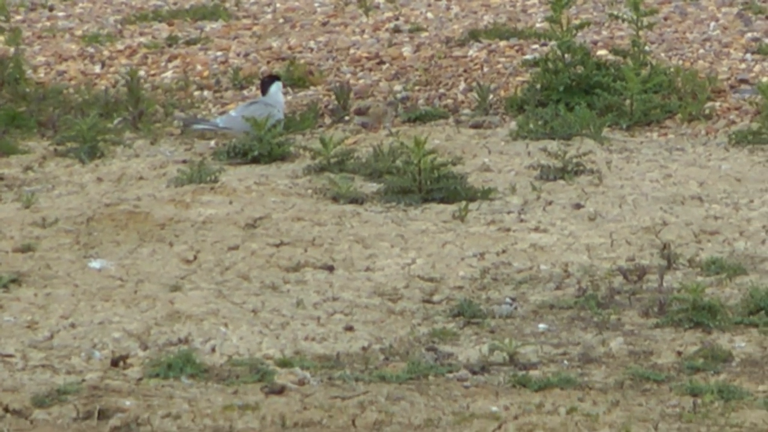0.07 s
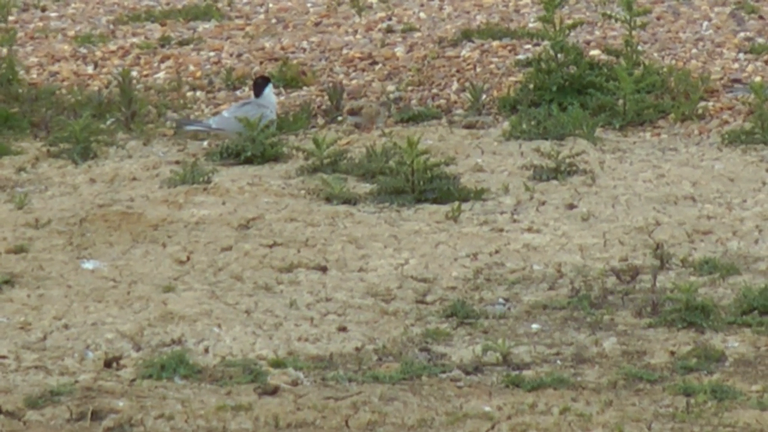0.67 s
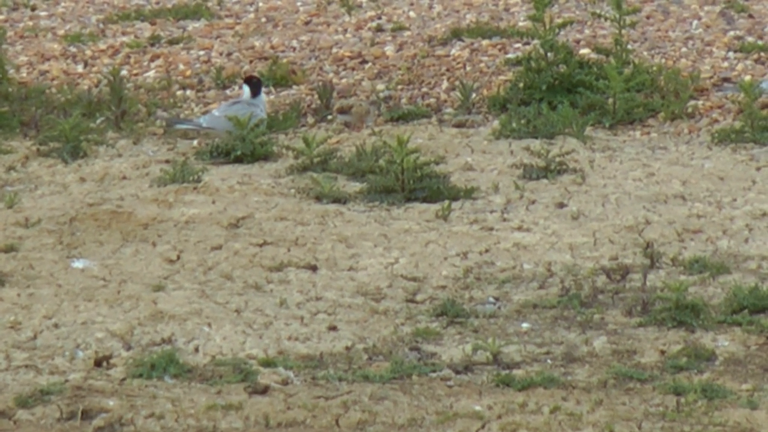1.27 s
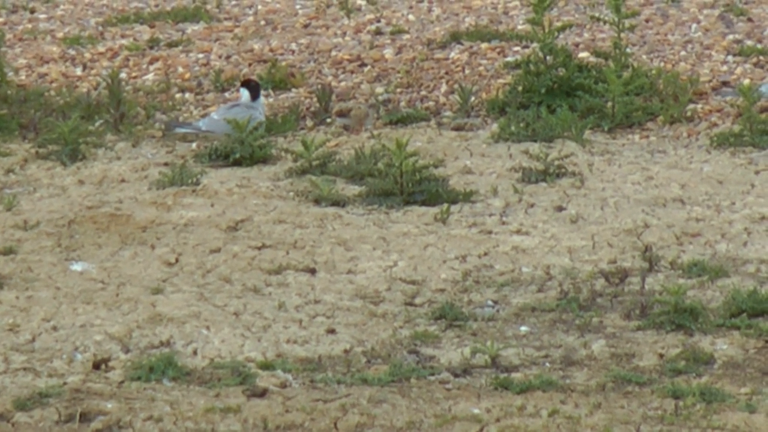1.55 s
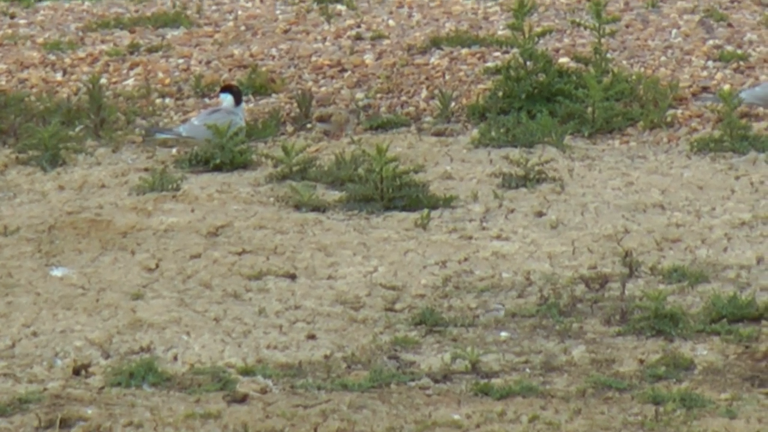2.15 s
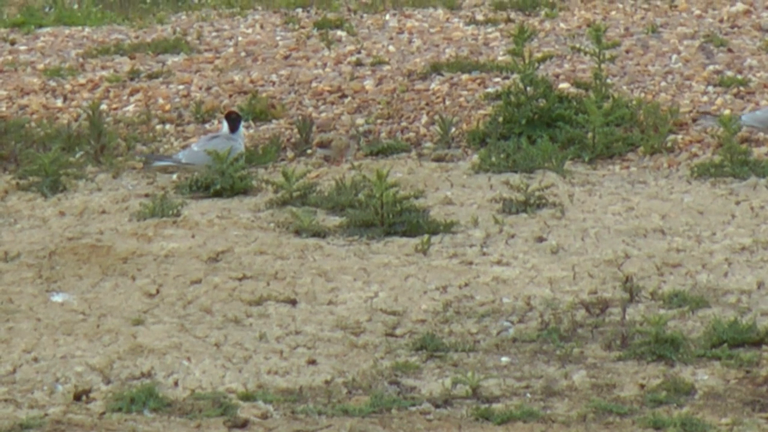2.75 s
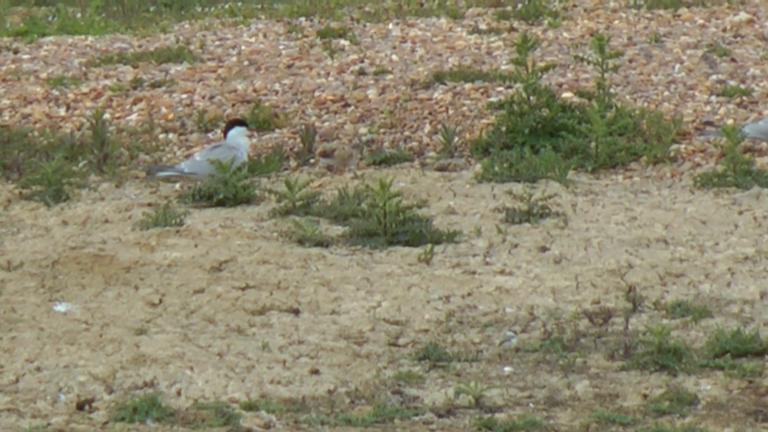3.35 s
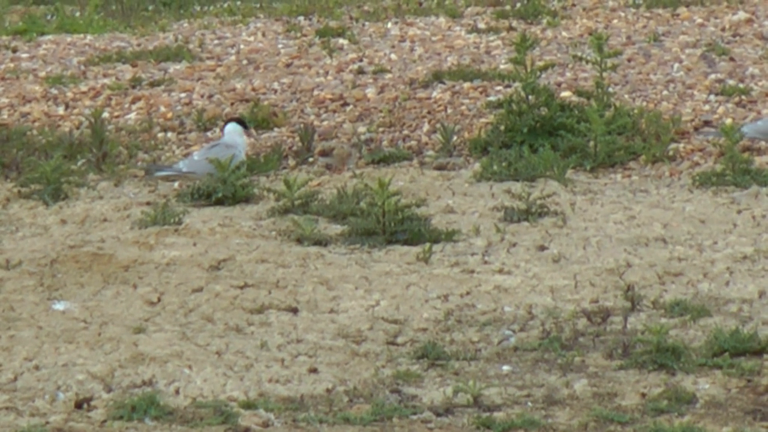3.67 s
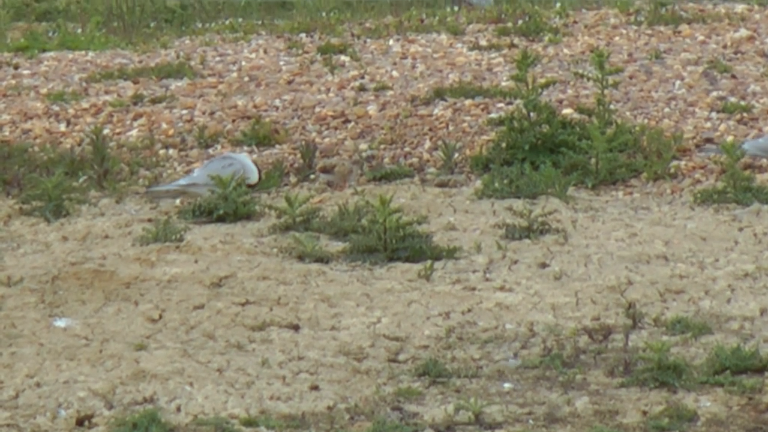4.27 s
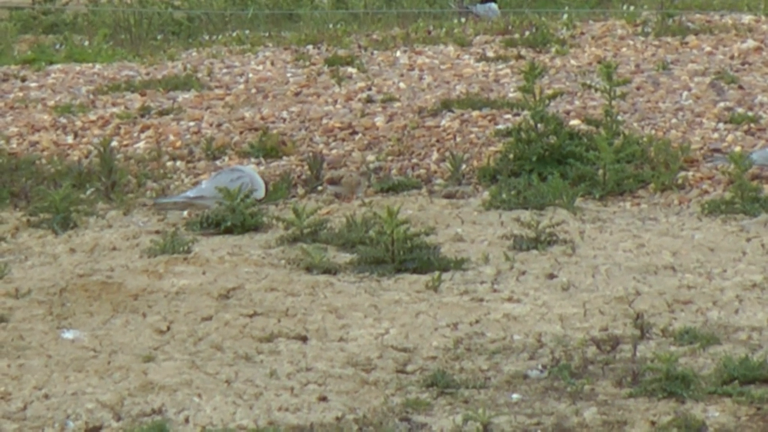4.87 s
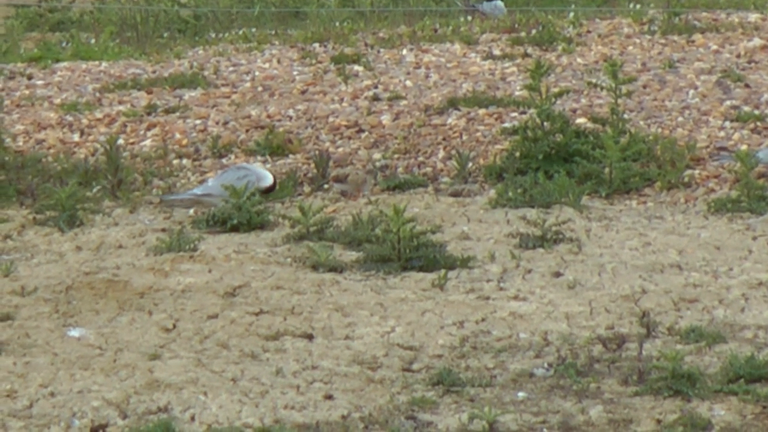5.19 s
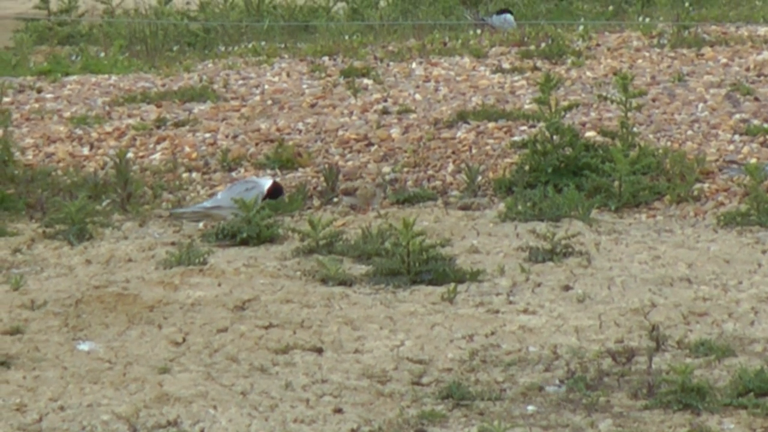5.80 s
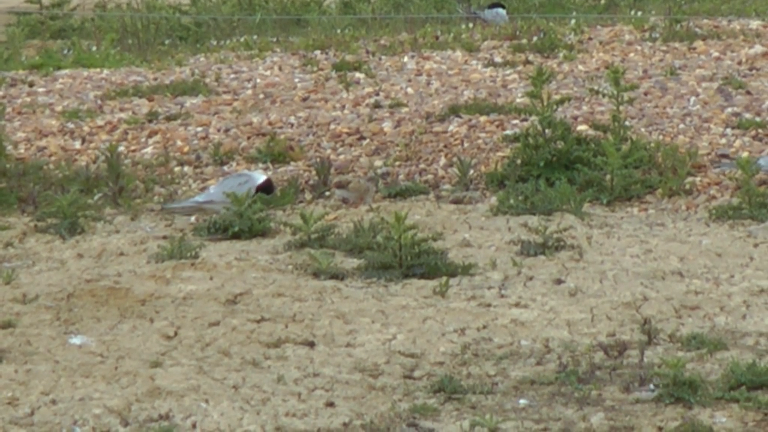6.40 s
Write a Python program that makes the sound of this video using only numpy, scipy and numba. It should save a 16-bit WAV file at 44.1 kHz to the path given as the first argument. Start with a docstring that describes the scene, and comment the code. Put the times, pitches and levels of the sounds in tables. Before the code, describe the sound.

A tern calls nearby with short, sharp, high chirps, about ten of them at uneven intervals. Gusts of wind rumble and flap on the microphone in three main bouts, at the start, a little before the middle and, hardest, near the end. Farther off, other birds add a few thin rising whistles and faint hoarse cries, mostly in the second half, over a soft, steady hiss of open shore.

```python
"""Terns on a shingle bank

One tern repeats a short, sharp "kip" nearby, each call scattered back by the open ground. Birds further
off slur thin whistles and hoarse cries over the hiss of the shore. Gusts rumble and flap on the
microphone ports, and the hardest buffets make a limiter duck everything else."""
import sys
import numpy as np
from scipy import signal
from scipy.fft import rfft, irfft
from scipy.io import wavfile
from scipy.ndimage import uniform_filter1d
from numba import njit

SR = 44100
rng = np.random.default_rng(int(sys.argv[2]) if len(sys.argv) > 2 else 0)


def dump(signal):
    """Clip the signal to [-1, 1] and save it as 16-bit WAV at the path in sys.argv[1]."""
    limited = np.clip(np.atleast_2d(signal).T, -1, 1)
    pcm = np.round(limited * 32767).astype(np.int16)
    wavfile.write(sys.argv[1], SR, pcm)


N = 292824
TIME = np.arange(N) / SR
OPPOSITE = np.array([[1], [-1]])  # sign of the side signal: left, right


def undb(db):
    """Decibels to gain."""
    return 10 ** (np.asarray(db) / 20)


def colour(x, points):
    """Filter by (frequency [Hz], level [dB]) points, falling steeply beyond the last."""
    hz, db = np.transpose(points)
    freq_hz = np.maximum(np.fft.rfftfreq(N, 1 / SR), 1)
    rolloff = np.minimum(hz[-1] / freq_hz, 1) ** 4
    return irfft(rfft(x) * rolloff * undb(np.interp(np.log(freq_hz), np.log(hz), db)), N)


def noise(points):
    """Unit-rms noise with the given spectrum."""
    x = colour(rng.standard_normal(N), points)
    return x / x.std()


def walk(rate_hz):
    """Smooth random wander, spread near 1."""
    hold = max(int(SR / rate_hz), 1)
    steps = np.repeat(rng.standard_normal(N // hold + 1), hold)
    return 1.3 * uniform_filter1d(uniform_filter1d(steps, hold), hold)[:N]


def add(track, start_s, sound):
    """Mix a sound into a track."""
    i = max(int(start_s * SR), 0)
    track[..., i:i + sound.shape[-1]] += sound[..., :N - i]


def shore(level_db=-49, wander_db=1.33):
    """Nearly steady hiss of distant water and wind in the grass."""
    # hiss spectrum: (frequency [Hz], density [dB])
    spectrum = [(100, 1.5), (300, -4.5), (700, 1.5), (1100, 0), (2000, -7), (3000, -13), (5000, -14),
                (7500, -18.5), (9500, -25.5), (14000, -30), (15500, -34)]
    # stereo width: (frequency [Hz], side minus mid [dB])
    width = [(100, -10), (400, -10.5), (1000, -4), (2500, -6), (6000, -6.5), (16000, -8.5)]
    # hiss level: ducks briefly after the early buffets, recovers, then stays nearly steady
    # (time [s], level [dB])
    level_curve = [(0, 1), (.85, -1.5), (1.3, 0.8), (2, -0.5), (6.64, -.3)]
    hiss = noise(spectrum) + OPPOSITE * colour(noise(spectrum), width)
    return hiss * undb(level_db + np.interp(TIME, *np.transpose(level_curve)) + wander_db * walk(5.6))


def airflow(rise_db_per_s=500, fall_db_per_s=104):
    """Flow level in dB: each gust rises fast, holds and dies back into the breeze."""
    # breeze with a late lull: (time [s], level [dB])
    breeze = [(0, -43.5), (6, -43.5), (6.3, -49), (6.64, -44)]
    # gusts at the microphone: (start [s], hold [s], level [dB])
    gusts = [(0, 0.078, -34.5), (0.162, 0.21, -31.5), (0.523, 0.29, -27.5), (0.876, 0.62, -28.5),
             (1.875, .15, -39), (2.327, .09, -30), (2.475, .23, -25), (3.037, 0.25, -37),
             (3.46, 0.018, -40), (3.811, 0.034, -32.5), (4.004, 0.085, -27.5), (4.289, .12, -31.5),
             (4.794, .03, -35.5), (4.994, 0.031, -36), (5.198, 0.51, -22.5), (5.875, 0.19, -35.5)]
    power = undb(2 * np.interp(TIME, *np.transpose(breeze)))
    for start_s, hold_s, db in gusts:
        before_db = rise_db_per_s * np.maximum(start_s - TIME, 0)
        after_db = fall_db_per_s * np.maximum(TIME - start_s - hold_s, 0)
        power += undb(2 * np.maximum(db - before_db - after_db, -120))
    return 10 * np.log10(power)


def turbulence(points, side_db, eddy_s):
    """Pressure noise at the two ports, each eddy of about equal strength."""
    pressure = noise(points) + undb(side_db) * OPPOSITE * noise(points)
    window = int(eddy_s * SR)
    power = uniform_filter1d(np.mean(pressure ** 2, axis=0), window)
    return pressure / np.sqrt(uniform_filter1d(power, window))


def small_eddies(flow_db, rate_hz=18, light_air_db=-43.5, offset_db=-8, growth=1.374, width_s=0.016):
    """Random eddies, stronger the harder it blows: (time [s], level [dB], width [s])."""
    count = int(N / SR * rate_hz)
    jitter, strength = rng.uniform(-0.98, 1, (count, 2)).T
    times_s = (np.arange(count) + (1 + jitter) / 2) / rate_hz
    excess_db = np.interp(times_s, TIME, flow_db) - light_air_db
    levels_db = light_air_db + offset_db + growth * excess_db + 2.5 * strength
    return [(s, db, width_s) for s, db in zip(times_s, levels_db)]


def passing(eddies, arrival=0.66, departure=1.027):
    """Pressure envelope of passing eddies; each arrives faster than it leaves."""
    power = np.zeros(N)
    for peak_s, db, width_s in eddies:
        near = slice(*np.searchsorted(TIME, [peak_s - 2 * width_s, peak_s + 2 * width_s]))
        t = TIME[near] - peak_s
        flank_s = width_s / 2 * np.where(t < 0, arrival, departure)
        power[near] += undb(2 * db) * np.exp(-(t / flank_s) ** 2)
    return np.sqrt(power)


def wind(wake_lag_s=0.011, wake_width_s=0.041, flutter_db=-10.5, flutter_growth=1.04, spike_db=5):
    """Slow pressure swings move both ports together; small eddies hit them apart, the hardest crack."""
    # hardest eddies: (time [s], body [dB], width [s], crack [dB], low wake thud [dB])
    buffets = [(.173, -26.5, 0.016, -61, -30.5), (0.224, -23.5, .022, -58, -38),
               (.267, -9, 0.0067, -20, -24), (.333, -17, 0.0088, -40, -22),
               (.588, -23.5, 0.023, -35.5, -22), (0.625, -14.5, 0.01, -38, -27),
               (0.676, -10, 0.015, -19.5, -27), (0.805, -17.5, 0.02, -44, -26.5),
               (.928, -23, 0.036, -36.5, -37), (.987, -26.5, 0.0096, -35, -31),
               (1.036, -23.5, 0.055, -38.5, -29), (1.233, -21.5, 0.0077, -44, -39),
               (1.456, -22.5, 0.012, -55, -26.5), (2.153, -31.5, 0.027, -55, -28.5),
               (2.321, -22, 0.01, -31.5, -22.5), (2.47, -15.5, 0.025, -22.5, -28),
               (2.505, -11, 0.029, -23, -19.5), (2.58, -13, 0.034, -23, -18), (2.638, -10, 0.049, -20, -21),
               (3.059, -28, 0.0089, -49, -25.5), (3.129, -34, 0.025, -54, -31),
               (3.914, -19, 0.013, -55, -24), (4.04, -26, 0.073, -47, -26),
               (4.209, -29.5, 0.019, -53, -29.5), (5.208, -12, 0.032, -26, -14),
               (5.268, -17.5, 0.025, -41, -22), (5.372, -19, 0.015, -35, -23),
               (5.434, -16.5, 0.04, -28.5, -23), (5.478, -17, 0.023, -33, -23),
               (5.534, -5.5, 0.019, -18, -23), (5.592, -11, 0.015, -33, -27), (5.619, -5, 0.02, -15.5, -17),
               (5.861, -14, .013, -34.5, -19.5), (5.904, -26, .01, -41, -36),
               (6.013, -30.5, 0.011, -52, -37)]
    # pressure spectra at the ports: (frequency [Hz], density [dB])
    rumble_spectrum = [(10, -23), (25, -15), (45, -7.5), (80, -2.5), (105, -6.5), (135, -20), (200, -17),
                       (500, -54)]
    flutter_spectrum = [(40, -19), (110, -0.5), (170, -3.5), (260, -0.5), (400, -8.5), (600, -20.5),
                        (1000, -25.5), (2000, -66)]
    body_spectrum = [(40, -27), (110, -10), (160, -4), (250, 6), (410, 1), (580, -12), (900, -28.5),
                     (2000, -65.5)]
    crack_spectrum = [(200, -19), (450, 5), (700, 3), (1100, -7), (1800, -19), (3000, -34), (5000, -60)]
    flow_db = airflow()
    wakes = passing([(s + wake_lag_s, db, wake_width_s) for s, _, _, _, db in buffets])
    gusting = undb(flow_db - 0.5 + 3 * walk(20))
    rumble = np.hypot(gusting, wakes) * turbulence(rumble_spectrum, side_db=-20, eddy_s=0.048)
    # fine turbulence grows with air speed
    fine_db = flow_db.max() + flutter_growth * (flow_db - flow_db.max()) + flutter_db + 3 * walk(70)
    flutter = undb(fine_db) * turbulence(flutter_spectrum, side_db=1.5, eddy_s=0.03)
    push = passing([(s, db, width_s) for s, db, width_s, _, _ in buffets] + small_eddies(flow_db))
    body = undb(1 + 1.96 * walk(160)) * push * turbulence(body_spectrum, side_db=4, eddy_s=0.0067)
    snap = passing([(s, db, width_s) for s, _, width_s, db, _ in buffets])
    spikes = undb(-1 + spike_db * walk(600))
    crack = spikes * snap * turbulence(crack_spectrum, side_db=3, eddy_s=0.0078)
    return rumble + flutter + body + crack


def slur(start_s, pitch_hz, flutter):
    """One whistle along a pitch course; fast pitch flutter makes it hoarse."""
    hz = pitch_hz * (1 + flutter[int(start_s * SR) + np.arange(len(pitch_hz))])
    return np.sin(2 * np.pi * np.cumsum(hz) / SR) * signal.windows.tukey(len(hz), 0.4)


def falling_calls(fall_octaves_per_s=2.2, flutter_depth=0.0611):
    """Hoarse cries across the colony, all sagging at the same rate."""
    # far cries: (start [s], length [s], centre pitch [Hz], relative level [dB])
    calls = [(0, 0.03, 2795, -52.5), (4.1, .049, 3350, -56), (4.31, .08, 2350, -57),
             (4.74, 0.063, 2840, -50), (4.98, .09, 2950, -53.5), (5.266, .055, 4400, -55),
             (5.32, 0.042, 3450, -52.5), (5.597, 0.021, 3600, -49), (5.742, 0.049, 3400, -50),
             (5.816, .09, 2920, -53), (5.933, 0.098, 5160, -55), (6.165, .05, 3550, -53.5),
             (6.266, 0.059, 2830, -52.5), (6.352, 0.067, 3200, -51.5)]
    out, flutter = np.zeros(N), flutter_depth * walk(1000)
    for start_s, length_s, hz, db in calls:
        t = TIME[:int(length_s * SR)] - length_s / 2
        pitch_hz = hz * 2 ** (-fall_octaves_per_s * t)
        add(out, start_s, undb(db) * slur(start_s, pitch_hz, flutter))
    return out


def ground(calls, t60_s=0.6, treble_t60_s=0.33, split_hz=4500, side_db=-6, build_s=0.0014,
           grain_db=3, bank_s=0.031, bank_spread_s=0.036, bank_db=3.5):
    """Stones and plants scatter a grainy tail whose treble dies first; a further bank prolongs it."""
    t = TIME[:SR // 2]
    mid, side = rng.standard_normal((2, len(t)))
    echoes = (mid + undb(side_db) * OPPOSITE * side) * (1 - np.exp(-t / build_s))
    bank = np.exp(-((t - bank_s) / bank_spread_s) ** 2)
    echoes *= undb(grain_db * walk(300)[:len(t)] + bank_db * bank)
    low = signal.sosfiltfilt(signal.butter(4, split_hz, fs=SR, output="sos"), echoes)
    response = low * undb(-60 * t / t60_s) + (echoes - low) * undb(-60 * t / treble_t60_s)
    response /= np.sqrt(np.sum(response ** 2) / 2)
    return signal.fftconvolve(calls[None], response, axes=1)[:, :N]


def kips(rasp=0.62, jitter=0.0054, shimmer_db=0.9, mid_dulling=0.18, left_minus_right_db=-2.2):
    """A harmonic tone snaps on, holds its pitch and drops with a rasp as the syrinx slackens."""
    # near calls: (start [s], pitch [Hz], length [s], relative level of partial 2, 3, 4, top ones [dB])
    calls = [(0.227, 1805, 0.046, -35, -32, -48.5, -57.5), (0.687, 1792, 0.045, -39, -43, -55, -75),
             (1.807, 1826, 0.047, -36, -41.5, -48, -66), (2.075, 1853, 0.04, -34, -33, -50, -60.5),
             (2.86, 1784, 0.042, -36.5, -38.5, -53.5, -64.5), (3.258, 1745, 0.037, -36, -41, -50.5, -65),
             (3.829, 1783, .035, -38, -35.5, -47, -61), (4.5184, 1829, 0.038, -38, -39.5, -56, -65),
             (4.917, 1817, 0.042, -42, -47, -62, -67), (5.646, 1710, 0.041, -42.5, -43, -73, -68)]
    # course of one kip: (share of length [0-1], pitch [ratio], level [dB])
    course = [(0, 1.088, -27), (.04, 1.03, -6.5), (0.171, .992, -6), (0.351, 1.006, -3), (.6, .996, -5),
              (.75, .968, -2.5), (.88, .875, -7.5), (0.999, 0.682, -8)]
    # top partials: (harmonic number, offset [dB])
    overtones = [(5, 4.5), (6, -1.5), (7, -0.5), (8, -5)]
    out = np.zeros((2, N))
    waver, shimmer, grit = walk(700), walk(500), walk(900)
    share, ratio, shape_db = np.transpose(course)
    for start_s, hz, length_s, second_db, third_db, fourth_db, top_db in calls:
        progress = np.linspace(0, 1, int(length_s * SR))
        here = int(start_s * SR) + np.arange(len(progress))
        tension = np.interp(progress, share, ratio)
        # the slack end is rough and loses its top
        roughness = 1 + 9.4 * progress ** 6
        dull_db = 90 * np.minimum(tension - 1, 0)
        pitch_hz = hz * tension * (1 + jitter * roughness * waver[here])
        phase = 2 * np.pi * np.cumsum(pitch_hz) / SR
        partials = [(1, second_db - 11), (2, second_db),
                    (3, third_db + mid_dulling * dull_db), (4, fourth_db + mid_dulling * dull_db)]
        partials += [(k, top_db + db + dull_db) for k, db in overtones]
        tone = np.sqrt(2) * sum(undb(db) * np.sin(k * phase) for k, db in partials)
        envelope = undb(np.interp(progress, share, shape_db) + shimmer_db * shimmer[here])
        envelope *= signal.windows.tukey(len(progress), 0.06)
        envelope *= 1 + rasp * progress ** 4 * grit[here]
        add(out, start_s, tone * envelope * undb(OPPOSITE * left_minus_right_db / 2))
    return out


def rising_whistles(max_flutter_depth=0.072, onset_db=-7, swell_db_per_s=153):
    """Upward slurs that swell; the long one levels off in pitch."""
    # far whistles: (start [s], length [s], from [Hz], to [Hz], glide time constant [s],
    # level [dB], hoarseness [0-1])
    whistles = [(0.637, .052, 2680, 3260, 0.18, -39.5, 0.22), (1.85, 0.05, 2740, 2930, 0.091, -47, 0.6),
                (4.404, .074, 2520, 3206, 0.27, -39, 0.07), (6.023, 0.195, 2950, 4240, .042, -53.5, 0.38)]
    out, flutter = np.zeros(N), max_flutter_depth * walk(1000)
    for start_s, length_s, from_hz, to_hz, glide_s, db, hoarseness in whistles:
        t = TIME[:int(length_s * SR)]
        climb = 1 - np.exp(-t / glide_s)
        pitch_hz = from_hz + (to_hz - from_hz) * climb / climb[-1]
        swell_db = np.minimum(onset_db + swell_db_per_s * t, 0)
        add(out, start_s, undb(db + swell_db) * slur(start_s, pitch_hz, hoarseness * flutter))
    return out


def scene():
    """Near tern, far birds, ground scatter, shore and wind; the colony has the largest scatter share."""
    near = undb(-1) * kips()
    whistles, colony = rising_whistles(), falling_calls()
    scatter = ground(undb(-2) * near.mean(axis=0) + undb(-3) * whistles + undb(-1) * colony)
    return near + whistles + undb(-1.5) * colony + scatter + shore() + wind()


@njit
def follow(x, attack_s, release_s):
    """Envelope follower with separate rise and fall times."""
    out, level = np.empty(len(x)), 0.
    for i in range(len(x)):
        level += (x[i] - level) / (SR * (attack_s if x[i] > level else release_s))
        out[i] = level
    return out


def record(dry, threshold_db=-9.5, ratio=5, cutoff_hz=15750):
    """A limiter ducks both channels after the hardest buffets; a steep low-pass cuts the top."""
    envelope = follow(np.abs(dry).max(axis=0), attack_s=0.00074, release_s=0.24)
    limited = dry / np.maximum(1, envelope / undb(threshold_db)) ** (1 - 1 / ratio)
    return signal.sosfilt(signal.ellip(10, 0.2, 80, cutoff_hz, fs=SR, output="sos"), limited)


dry = scene()
out = record(dry)
dump(out)
```